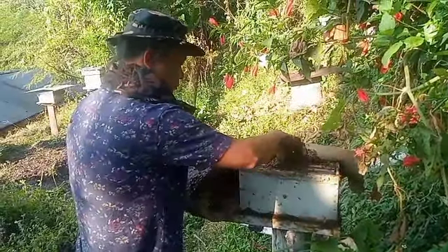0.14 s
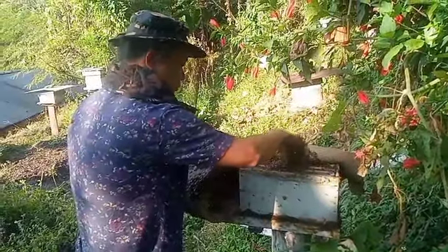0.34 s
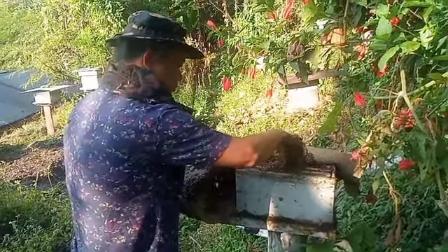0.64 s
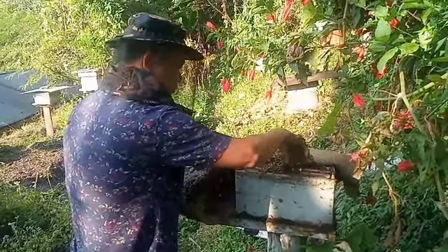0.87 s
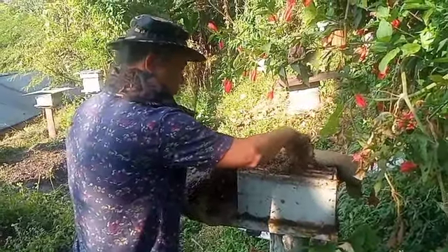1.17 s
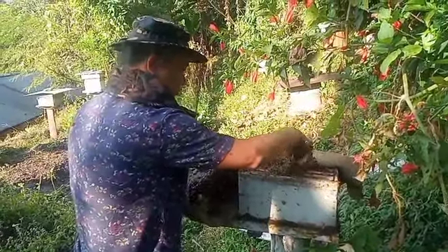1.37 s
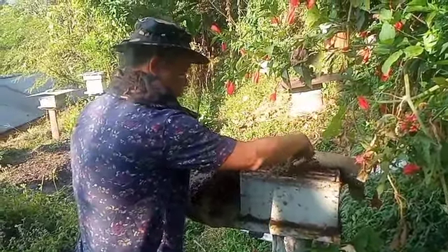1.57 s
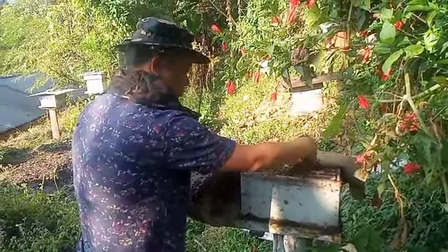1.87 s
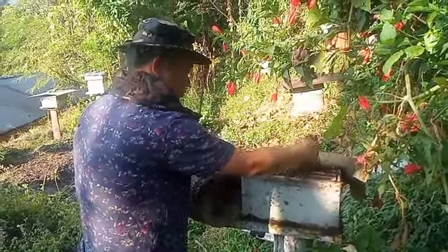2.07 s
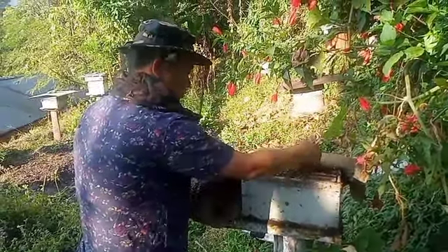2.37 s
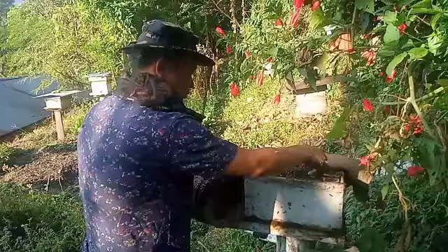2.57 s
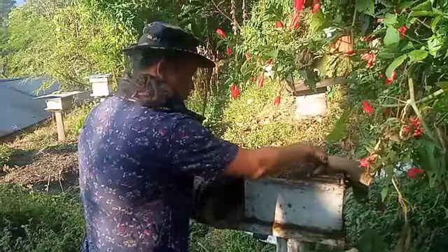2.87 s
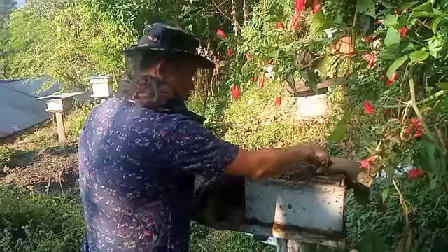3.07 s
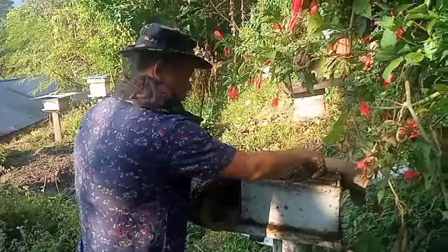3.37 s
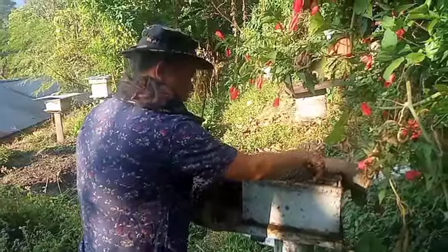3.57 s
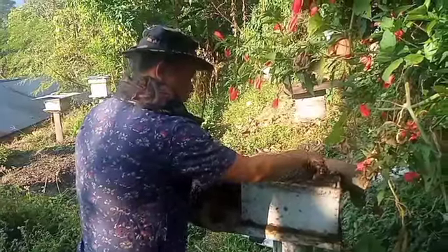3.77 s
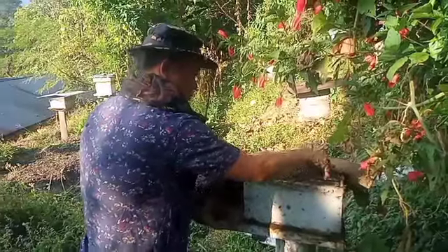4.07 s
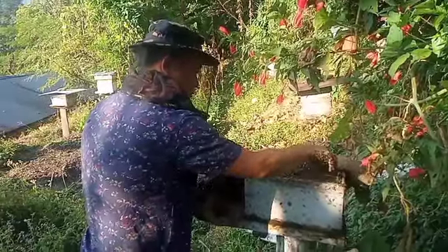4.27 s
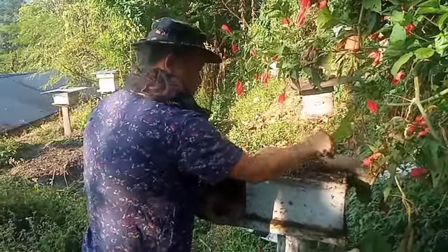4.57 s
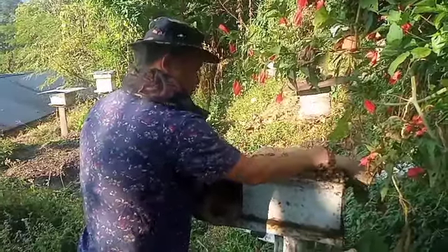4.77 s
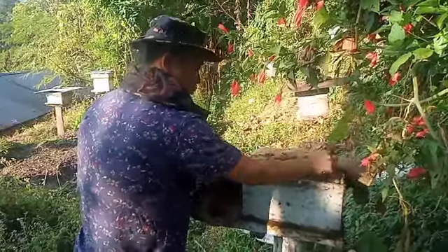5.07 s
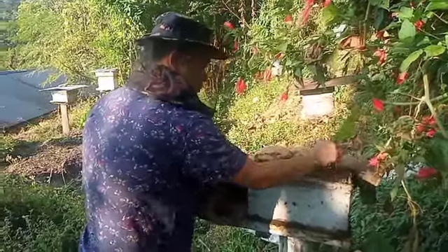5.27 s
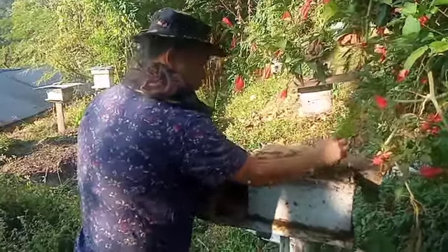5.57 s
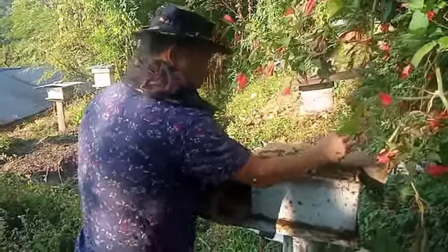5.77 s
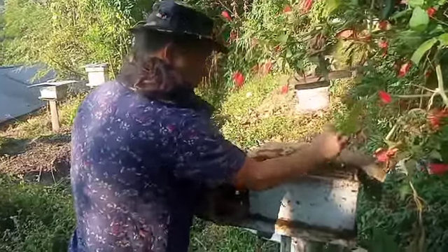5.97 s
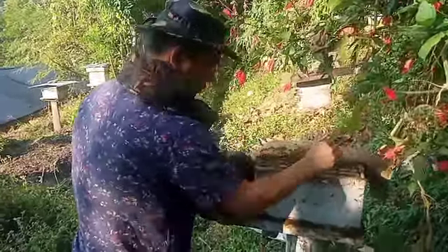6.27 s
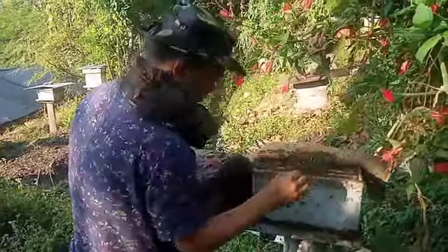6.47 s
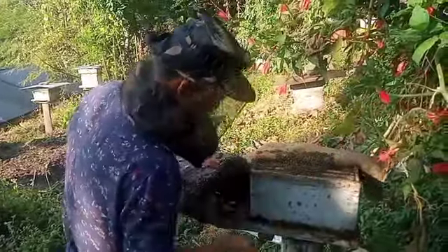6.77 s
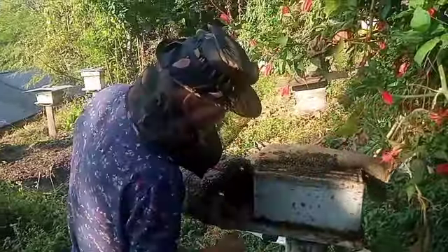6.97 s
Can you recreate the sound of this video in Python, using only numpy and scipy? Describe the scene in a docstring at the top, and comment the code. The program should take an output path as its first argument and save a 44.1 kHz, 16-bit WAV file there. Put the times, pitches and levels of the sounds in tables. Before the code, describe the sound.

A low throbbing aircraft-like drone with soft rumble fills the bottom of an open-air scene. Above it bees buzz around 270 hertz, blurred by many wings, with crisp crawling rustle. Short scratchy hand strokes touch the wooden box, then faint swishes sweep the insects. Small birds chirp in gliding whistles first, a buzzy high trill follows midway, and a few notes return near the end. Mono, natural, little echo.

```python
"""Hiving a honeybee colony by hand

A garden, one microphone: a colony hums with wing strokes and seethes with fine noise contacts.
A hand brushes and scrapes the wooden hive in grainy strokes; birds whistle in gliding tones far off,
and one rasps a short trill with fast pitch shake. Over it lies a deep, slowly sinking drone, most likely
a twin-engined plane: two sets of blade harmonics beat against each other over a noise rumble."""
import sys
import numpy as np
from scipy import signal
from scipy.fft import rfft, irfft, next_fast_len
from scipy.io import wavfile
from scipy.ndimage import uniform_filter1d

SR = 44100
rng = np.random.default_rng(int(sys.argv[2]) if len(sys.argv) > 2 else 0)


def dump(signal):
    """Clip the signal to [-1, 1] and save it as 16-bit WAV at the path in sys.argv[1]."""
    limited = np.clip(np.atleast_2d(signal).T, -1, 1)
    pcm = np.round(limited * 32767).astype(np.int16)
    wavfile.write(sys.argv[1], SR, pcm)


N = 314433
T = np.arange(N) / SR  # time in s


def undb(db):
    """Decibels to gain."""
    return 10 ** (np.asarray(db) / 20)


def unit(x):
    """Scale to rms 1."""
    return x / np.sqrt(np.mean(x ** 2))


def curves(table):
    """The columns of a table of timed rows, one value a sample."""
    time_s, *columns = np.transpose(table)
    return [np.interp(T, time_s, column) for column in columns]


def colour(x, points):
    """Shape a spectrum by (Hz, dB) points, joined along log frequency; rms 1."""
    point_hz, point_db = np.transpose(points)
    size = next_fast_len(N)
    bin_hz = np.maximum(np.arange(size // 2 + 1) * SR / size, 1)
    gain = undb(np.interp(np.log(bin_hz), np.log(point_hz), point_db))
    return unit(irfft(rfft(x, size) * gain, size)[:N])


def walk(rate):
    """Random wander through `rate` new values a second; spread near 1."""
    knots = rng.standard_normal(8192)
    return np.interp(T * rate, np.arange(len(knots)), knots)


def turns(hz):
    """Cycles completed at a moving frequency."""
    return np.cumsum(hz) / SR


def crackle(spread_db):
    """Dense tiny contacts of unequal size."""
    size_db = spread_db * np.clip(rng.standard_normal(N), -2, 2)
    return rng.standard_normal(N) * undb(size_db)


# Colour of the massed wing beats: frequency_hz, relative level_db
WING_COLOUR = [(150, -7), (250, 4.5), (400, -7), (590, 2), (680, -13.5), (850, -4.5), (1000, -8.5),
               (1480, -5), (1800, -14), (3500, -9.5), (5000, -23.5), (8000, -49)]


def flying_bees(count=18, wing_hz=272, spread=.1, veer=.036, distance_db=4):
    """Each bee beats its wings at its own rate, changing pitch and distance as it circles."""
    swarm = np.zeros(N)
    for rank in np.linspace(-1, 1, count):
        hz = wing_hz * (1 + spread * rank + veer * walk(10))
        stroke = turns(hz) + rng.random()
        # one sharp push of air per wing stroke
        push = np.maximum(1 - np.abs(stroke % 1 - .5) * 36, 0)
        swarm += push * undb(distance_db * walk(6))
    steady_push = uniform_filter1d(swarm, SR // 100)
    return colour(swarm - steady_push, WING_COLOUR)


def flicker_bands(x, depth_db, count=14):
    """Each band of the sound flickers in level on its own, a few dB up and down."""
    size = next_fast_len(N)
    spectrum = rfft(x, size)
    centre_hz = np.geomspace(600, 6000, count)
    bin_hz = np.arange(len(spectrum)) * SR / size
    flickering = np.zeros(N)
    for band in np.eye(count):
        # overlapping triangles; the end bands reach to the spectrum's edges
        share = np.interp(bin_hz, centre_hz, band)
        band_sound = irfft(spectrum * share, size)[:N]
        flickering += band_sound * undb(depth_db * walk(16))
    return unit(flickering)


# Colony loudness before the trims below: time_s, wing hum level_db, crawling rustle level_db
COLONY_LEVEL = [(0, -46, -52), (.6, -52.5, -53), (1.3, -50.5, -54.5), (2.2, -51, -54), (3, -51, -54.5),
                (3.8, -48, -53), (4.4, -50, -52), (5, -47.5, -52), (5.8, -47, -53), (6.5, -45, -53.5),
                (7.1, -48, -52)]
# Legs and wings rubbing in the cluster: frequency_hz, relative level_db per Hz
SEETHE_COLOUR = [(300, -17), (800, -2), (1000, -2.5), (1450, -1), (1800, -2), (2350, -2.5), (2900, -0.5),
                 (3850, -2), (4400, -11.5), (5500, -24), (6200, -19), (7200, -22.5), (8000, -34),
                 (15000, -46.5)]


def colony(hum_trim_db=2, rustle_trim_db=5.5, grain_db=3, seethe_flicker_db=1.5, hum_flicker_db=2.5):
    """Wing hum of the fliers over the dry seething of the crawling cluster."""
    hum_db, rustle_db = curves(COLONY_LEVEL)
    seethe = flicker_bands(colour(crackle(grain_db), SEETHE_COLOUR), seethe_flicker_db)
    fliers = flicker_bands(flying_bees(), hum_flicker_db)
    return undb(hum_db + hum_trim_db) * fliers + undb(rustle_db + rustle_trim_db) * seethe


def strokes(table, points, grain_db):
    """Rubbing strokes: fine friction grains that swell quickly and ebb."""
    force = np.zeros(N)
    for start_s, length_s, level_db in table:
        # peaks at a quarter of the length, silent at 1.2 lengths
        force += undb(level_db) * np.interp((T - start_s) / length_s, [0, .25, 1.2], [0, 1, 0])
    return force * colour(crackle(grain_db), points)


# The hand scrapes on the box: start_s, length_s, level_db at the peak
SCRAPE_STROKES = [(.72, 0.12, -47.5), (1.5, 0.084, -50.5), (2.48, 0.072, -39.5), (3.36, 0.031, -45),
                  (3.72, 0.1, -46.5), (6.775, 0.05, -44.5)]
# Scrape spectrum: frequency_hz, relative level_db per Hz
SCRAPE_SPECTRUM = [(500, -1.5), (1400, -2), (1900, 7.5), (3700, 6), (5000, -18), (7000, -27), (10000, -37),
                   (15000, -46)]
# Duller rubs of the arm along the wooden rim: start_s, length_s, level_db at the peak
RUB_STROKES = [(.72, 0.073, -46), (.98, .2, -52), (2.45, 0.32, -52.5), (5.38, .1, -52)]
# Rub spectrum: frequency_hz, relative level_db per Hz
RUB_SPECTRUM = [(300, -17), (600, -1.5), (950, 3), (1500, -1), (2500, -11), (5000, -44)]
# Fine swish of bees being swept along: start_s, length_s, level_db at the peak
SWEEP_STROKES = [(3.18, 0.33, -73), (3.6, 0.31, -64), (4.08, 0.25, -62), (4.63, 0.34, -64)]
# Sweep spectrum: frequency_hz, relative level_db per Hz
SWEEP_SPECTRUM = [(2000, -9), (4000, 11), (7000, 7), (9000, -4.5), (12000, -12), (14500, -4.5)]


def hand():
    """Friction on wood and among bees: coarse grains for scrapes, finer ones for rubs and sweeps."""
    scrapes = strokes(SCRAPE_STROKES, SCRAPE_SPECTRUM, grain_db=12.5)
    rubs = strokes(RUB_STROKES, RUB_SPECTRUM, grain_db=3)
    sweeps = strokes(SWEEP_STROKES, SWEEP_SPECTRUM, grain_db=2)
    return scrapes + rubs + sweeps


# Whistles far off, before waver and flutter: start_s, length_s, start pitch_hz, end pitch_hz, level_db
WHISTLE_NOTES = [(.13, 0.14, 1870, 1890, -52.5), (0.253, 0.085, 3550, 3630, -53.5),
                 (0.366, 0.072, 2680, 2920, -45.5), (0.428, 0.058, 3040, 2930, -49),
                 (0.519, 0.046, 2900, 3000, -52), (0.586, 0.055, 3200, 3350, -51),
                 (.645, .065, 2593, 2540, -50.5), (2.84, .14, 3180, 2810, -49),
                 (5.031, 0.054, 3060, 2980, -51), (5.22, .105, 3050, 2920, -52.5),
                 (6.175, 0.054, 2560, 2820, -52), (6.231, 0.08, 2950, 2990, -48),
                 (6.415, .05, 2620, 2560, -49), (6.48, 0.11, 2570, 2630, -54.5)]


def whistles(waver=0.011, flutter_db=3.5):
    """Near-pure gliding notes that waver in pitch and flutter in level."""
    song = np.zeros(N)
    wobble = 1 + waver * walk(120)
    for start_s, length_s, start_hz, end_hz, level_db in WHISTLE_NOTES:
        progress = np.clip((T - start_s) / length_s, 0, 1)
        hz = (start_hz + (end_hz - start_hz) * progress) * wobble
        swell = np.sqrt(4 * progress * (1 - progress))
        song += undb(level_db) * swell * np.sin(2 * np.pi * turns(hz))
    return song * undb(flutter_db * walk(70))


# The rasping trill comes in several surges: time_s, level_db
TRILL_SURGES = [(3.3, -90), (3.39, -65), (3.49, -53), (3.58, -50.5), (3.68, -53), (3.78, -46.5),
                (3.92, -49.5), (4.04, -46.5), (4.14, -51), (4.26, -48), (4.34, -59), (4.42, -90)]
# It starts high by the drop and settles on one pitch
TRILL_PITCH_HZ, TRILL_DROP_HZ = 3565, 480
TRILL_SETTLE_START_S, TRILL_SETTLE_S = 3.44, .12


def trill(swing_hz=165, pulse_hz=135, jitter_hz=105, rough_db=4.5, sway_db=0.5):
    """One high tone shaken fast and unevenly in pitch and strength, so that it rasps."""
    age_s = np.maximum(T - TRILL_SETTLE_START_S, 0)
    hz = TRILL_PITCH_HZ + TRILL_DROP_HZ * np.exp(-age_s / TRILL_SETTLE_S)
    (level_db,) = curves(TRILL_SURGES)
    shake = np.sin(2 * np.pi * turns(pulse_hz * (1 + .1 * walk(20))))
    tone = np.sin(2 * np.pi * turns(hz + swing_hz * shake + jitter_hz * walk(500)))
    rasp = unit(tone * undb(rough_db * walk(700)))
    return undb(level_db + sway_db * walk(45)) * rasp


def foliage(x, echo_db=-6, echo_t60_s=.4):
    """Leaves and trunks scatter a distant call into a short tail."""
    tail_s = T[:SR // 2]
    leaves = rng.standard_normal(SR // 2) * np.exp(-np.log(1000) * tail_s / echo_t60_s)
    echo = signal.fftconvolve(x, leaves / np.linalg.norm(leaves))[:N]
    return x + undb(echo_db) * echo


# Propeller drone, sinking as the plane goes by: time_s, blade rate pitch_hz
BLADE_PITCH = [(0, 92.2), (.8, 91.97), (2, 91.36), (2.8, 90.77), (3.6, 90.42), (4.4, 89.8), (4.8, 90),
               (5.9, 88.86), (7.1, 89.16)]
# The two propellers run slightly out of step: time_s, difference of their blade rates_hz
BLADE_MISMATCH = [(0, 0.56), (1.8, .49), (3.3, 0.51), (4.2, 0.46), (5.4, 0.487), (7.1, 0.51)]
# One row per blade harmonic 1 to 5: place in the beat cycle at the start (0-1),
# strength of the weaker propeller (0-1)
BLADE_HARMONICS = [(0.33, 0.64), (0.75, 0.73), (0.17, 0.67), (0.53, 0.39), (0.64, .6)]
# Deep drone: time_s, fundamental level_db, octave level_db
DEEP_LEVEL = [(0, -47.5, -27.5), (.25, -27, -29), (.8, -35.5, -34.5), (1.4, -31.5, -31), (2.2, -32, -32),
              (3.1, -34, -38), (3.9, -40.5, -37), (4.5, -38, -40.5), (5.15, -34, -38.5), (5.9, -36, -39.5),
              (6.35, -38, -32), (6.8, -36, -34), (7.1, -43, -33.5)]
# Overtones: time_s, third level_db, fourth level_db, fifth harmonic level_db
UPPER_LEVEL = [(0, -39.5, -55, -59.5), (.75, -43, -42, -67.5), (1.2, -45.5, -51, -65.5),
               (1.7, -40, -42.5, -52.5), (2.1, -48, -53, -65), (2.8, -45.5, -52, -64),
               (3.3, -45, -47.5, -61), (3.75, -41, -58.5, -52), (4.25, -41.5, -44.5, -65.5),
               (4.6, -40, -46.5, -58), (5.1, -39.5, -42, -58), (5.9, -45.5, -49.5, -60.5),
               (6.4, -36.5, -43.5, -51), (6.85, -26, -30.5, -50), (7.1, -34.5, -40, -55)]


def propellers(flutter_db=1.5, fade_db=1.1, waver=0.072, weaker_waver=0.17):
    """Two propellers nearly in step: harmonic k beats k times as fast as their blade rates differ."""
    (blade_hz,), (mismatch_hz,) = curves(BLADE_PITCH), curves(BLADE_MISMATCH)
    levels = curves(DEEP_LEVEL) + curves(UPPER_LEVEL)
    blades, slip = turns(blade_hz), turns(mismatch_hz)
    drone = np.zeros(N)
    for k, ((place, weaker), level_db) in enumerate(zip(BLADE_HARMONICS, levels), 1):
        # turbulent air makes each harmonic fade and flutter a little in level and phase
        air_db = fade_db * walk(5.5) + flutter_db * walk(24)
        phase = 2 * np.pi * (k * blades + rng.random()) + waver * k * walk(8.9)
        apart = np.pi * (k * slip + place)
        stronger_tone = np.cos(phase - apart)
        weaker_tone = weaker * np.cos(phase + apart + weaker_waver * walk(6))
        drone += np.sqrt(2) * (stronger_tone + weaker_tone) * undb(level_db + air_db)
    return drone


# Rumble of the plane's exhaust and wash: frequency_hz, relative level_db per Hz
RUMBLE_COLOUR = [(25, -19.5), (45, -17), (58, -12.5), (72, 1), (100, -3), (135, 2.5), (170, 5), (200, -11),
                 (245, -1.5), (320, -9), (420, -9.5), (590, -10), (680, -17), (1500, -65)]


def exhaust(start_db=-39.0, end_db=-41, sway_db=0.5):
    """The plane's low noise rumble sways and slowly recedes."""
    level_db = np.linspace(start_db, end_db, N) + sway_db * walk(4)
    return undb(level_db) * colour(rng.standard_normal(N), RUMBLE_COLOUR)


def scene():
    """Colony, hand, birds and plane at one microphone."""
    birds = foliage(whistles() + trill())
    plane = propellers() + exhaust()
    return (colony() + hand() + birds + plane)[None]


def record(dry):
    """The recorder cuts the top with a steep low-pass at 15.5 kHz."""
    low_pass = signal.ellip(10, .1, 80, 15500, fs=SR, output="sos")
    return signal.sosfilt(low_pass, dry)


dry = scene()
out = record(dry)
dump(out)
```